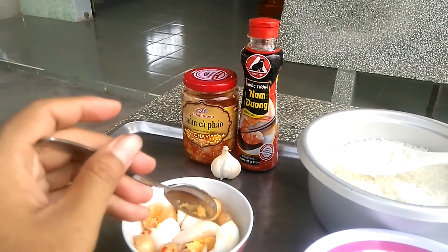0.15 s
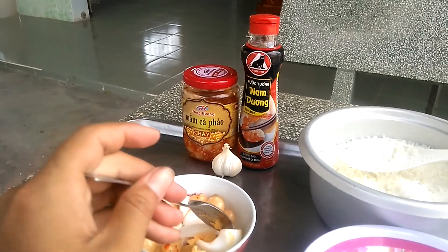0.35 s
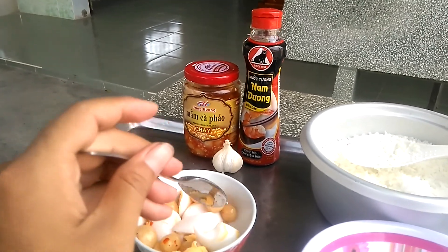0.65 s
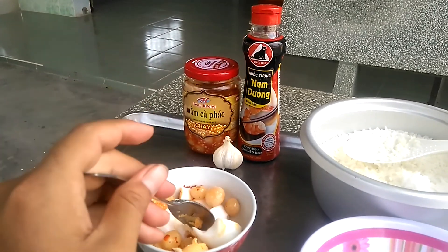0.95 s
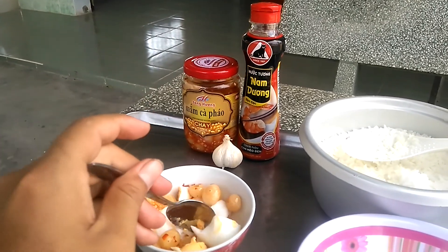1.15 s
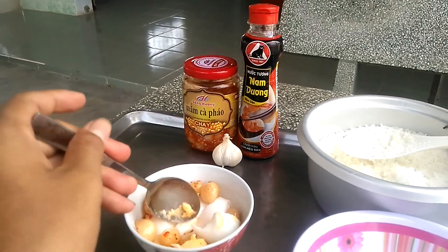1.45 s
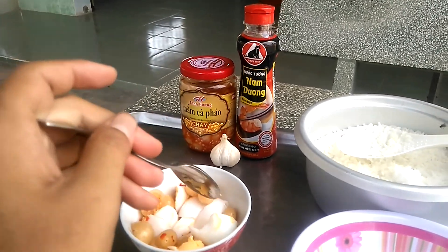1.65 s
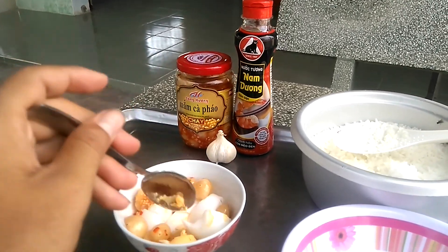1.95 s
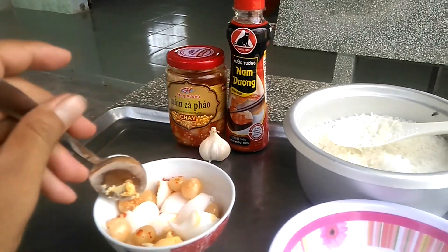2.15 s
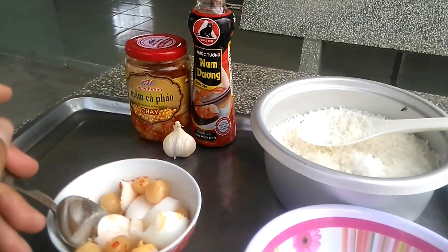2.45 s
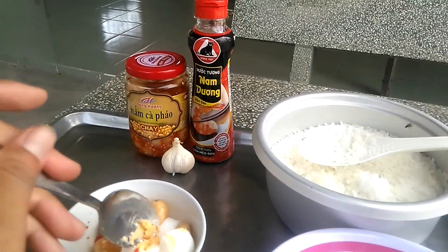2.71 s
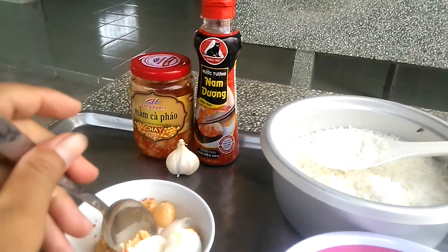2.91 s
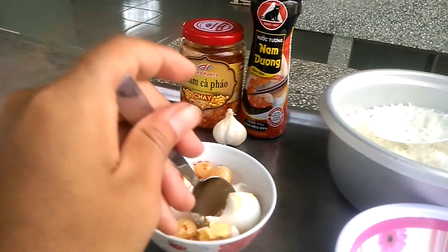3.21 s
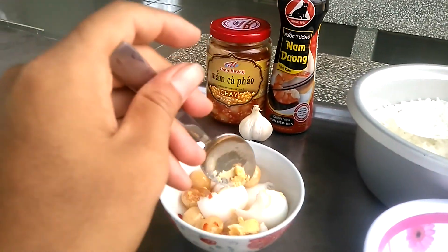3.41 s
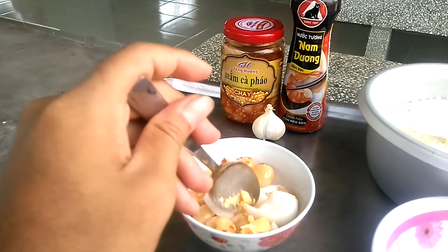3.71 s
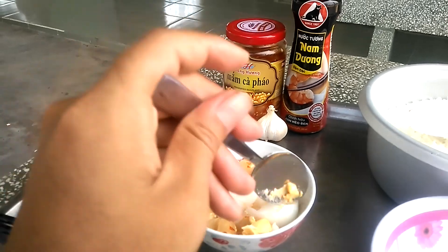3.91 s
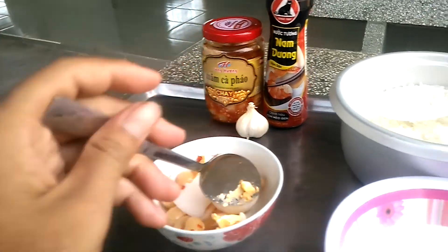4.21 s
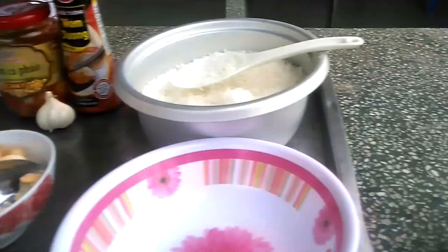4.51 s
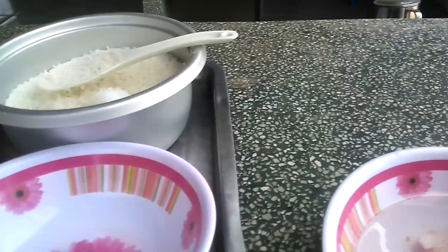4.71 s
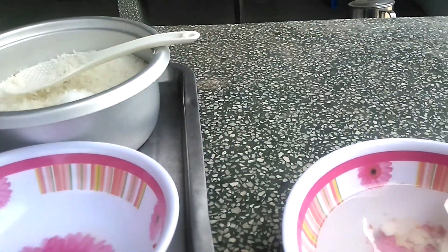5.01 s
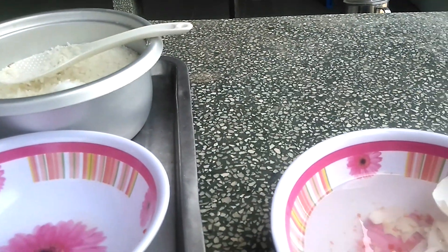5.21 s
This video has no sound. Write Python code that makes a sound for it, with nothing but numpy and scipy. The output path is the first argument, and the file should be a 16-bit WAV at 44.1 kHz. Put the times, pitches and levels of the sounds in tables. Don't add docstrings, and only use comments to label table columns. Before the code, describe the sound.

A steel spoon cuts food in a small ceramic bowl with dull clacks, then drops on the rim with bright clinks, amid wind pops.

```python
import sys
import numpy as np
from scipy import signal
from scipy.fft import rfft, irfft
from scipy.io import wavfile
from scipy.ndimage import uniform_filter1d

SR = 44100
rng = np.random.default_rng(int(sys.argv[2]) if len(sys.argv) > 2 else 0)


def invert_db(x):
    u = np.asarray(x, float) / 20
    return 10 ** u


def generate_wav(sig):
    pcm = np.round(np.clip(np.atleast_2d(sig).T, -1, 1) * 32767).astype(np.int16)
    wavfile.write(sys.argv[1], SR, pcm)


N = 236243

# frequency in Hz, level in dB per Hz.
AIR_SPECTRUM = [(40, -0.5), (100, -13), (200, -13), (400, -10), (700, -12), (1000, -13.5), (1500, -13.5),
                (2500, -16.5), (3700, -22.5), (4400, -30.5), (7000, -31.5), (10000, -36), (13500, -38.5),
                (15000, -55)]
AIR_DB = -60.5
# frequency in Hz, correlation from 0 to 1.
PORT_LIKENESS = [(60, 0.36), (180, 0.59), (550, 0.92), (1650, 0), (4970, 0.088), (15000, 0)]
# multiple of the fundamental, level in dB.
MOTOR_HARMONICS = [(3, -66.5), (4, -59.5), (5, -60), (6, -62), (8, -74)]
MOTOR_HZ = 64.9

# start in seconds, length in seconds, rumble in dB, left minus right in dB.
GUSTS = [(0, 0.022, -61, 1), (.17, .13, -56.5, 18), (.545, 0.17, -53, 17), (.74, 0.032, -61, -17),
         (1.0, 0.33, -63, 11.5), (1.39, 0.039, -53, 14), (1.45, 0.23, -53.5, -1),
         (1.768, 0.032, -36.5, 22.5), (1.83, 0.058, -41, -3), (1.93, 0.083, -47, 11.5),
         (2.065, 0.013, -46, 20), (2.13, 0.08, -49, 24), (2.35, 0.023, -53.5, 26), (2.46, 0.077, -57, 18),
         (2.55, 0.32, -66, 17), (2.98, 0.089, -49.5, 5.5), (3.05, 0.12, -46, 7), (3.19, 0.031, -54, 10),
         (3.29, .18, -38.5, 12.5), (3.54, 0.22, -53, -3), (3.88, .03, -58, 20), (4.085, 0.084, -53, 5),
         (5.32, .04, -59, 20.5)]
CALM_DB, GUST_RISE_S, GUST_FALL_S = -73, 0.0098, 0.015
PUFF_GAP_S, PUFF_OVER_DB, PUFF_SPREAD_DB, PUFF_HZ = 0.036, 2.5, 2, 180
# time in seconds, level in dB, pitch in Hz, port (0 left, 1 right).
POPS = [(.18, -32, 137, 0), (0.231, -31.5, 199, 0), (.293, -50, 180, 0), (0.564, -31.5, 312, 0),
        (.576, -28, 220, 0), (0.66, -26.5, 187, 0), (.698, -29, 180, 0), (.751, -38.5, 180, 1),
        (1.407, -27.5, 124, 0), (1.773, -20, 330, 0), (1.784, -12, 210, 0), (1.843, -10, 245, 1),
        (1.878, -31.5, 210, 1), (1.973, -27, 197, 0), (2.004, -28, 190, 0), (2.08, -12.5, 230, 0),
        (2.149, -24.5, 312, 0), (2.166, -23.5, 197, 0), (2.186, -25.5, 278, 0), (2.492, -28, 200, 0),
        (3.08, -31, 130, 1), (3.162, -28, 190, 0), (3.304, -28.5, 210, 0), (3.379, -29, 144, 0),
        (3.42, -26.5, 212, 1), (3.444, -24, 200, 0), (3.459, -25, 286, 0), (3.609, -37, 200, 1),
        (3.76, -34.5, 119.8, 1), (5.337, -35.5, 217, 0)]

# start in seconds, time held in seconds, gain while open in dB.
OPENINGS = [(.109, 0.113, -3.5), (.28, 0.05, -7.5), (.42, 0.045, -11), (0.539, .16, -3), (1.073, 0.049, -6),
            (1.251, 0.057, -0.5), (1.761, 0.13, -4), (1.936, 0.11, -4), (2.056, 0.16, -5.5),
            (2.348, 0.049, -7.5), (2.45, 0.09, -8.5), (2.643, 0.074, -6), (2.905, 0.095, -8),
            (3.019, 0.69, -9), (3.345, 0.13, -1), (3.728, 0.09, -1.5), (4.083, .12, -3),
            (4.412, 0.165, -1.5), (4.638, 0.23, -2.5), (5.32, .05, -10)]
# time in seconds, gain in dB.
SHUT_GAIN = [(0, -13), (1.4, -11), (2.6, -11), (3.6, -14), (4.3, -14.5), (5.36, -15)]
CLOSING_S, AJAR_DB, AJAR_DB_PER_S = 0.016, -7, 28

# frequency in Hz, level in dB, rise in seconds,
# left minus right in dB.
LID_MODES = [(690, -20, 0.0015, 0), (1477, -0.5, 0.0015, -3.5), (3300, -21.5, 0.00089, 1),
             (4580, -35.5, .0015, 3), (5780, -25, .0006, 11), (6650, -22.5, 0.0016, -2.5),
             (8600, -17, .0004, -7), (13000, -20.5, .0002, 1.5), (1510, -40.5, 0.0084, -3),
             (1500, -43.5, 0.051, -1.5)]
LID_KNOCK_S = 0.115
# time in seconds, snap in dB, snap pitch in Hz, ring in dB.
TICKS = [
    (.1103, -36, 6800, -60),
    (.1128, -35, 8000, -60),
    (.8724, -32, 7600, -60),
    (1.0764, -39, 8300, -42),
    (1.0805, -29, 7500, -38),
    (1.1078, -36, 8000, -29),
    (1.1125, -37, 8000, -50),
]
SNAP_RISE_S, TICK_RING_HZ, TICK_RING_RISE_S = 0.00018, 3030, 0.0011
# time in seconds, level in dB, pitch in Hz,
# rise in seconds, left minus right in dB.
KNOCKS = [(1.11, -25, 1440, 0.0011, -7), (2.3495, -39.5, 1780, 0.005, -19),
          (2.3505, -25.5, 5850, 0.0041, -7), (2.620, -56.5, 6300, 0.008, 5),
          (3.3505, -24.5, 3470, 0.0022, 18), (3.7319, -15, 4865, 0.0016, 17.5),
          (3.732, -12, 5410, 0.0013, 4), (4.0855, -9, 5840, 0.0023, 10), (4.086, -13, 3378, 0.0032, 5),
          (4.0856, -34, 15400, .0004, 1.5), (3.7312, -40, 15200, .0004, 1.5),
          (3.3503, -42, 15400, .0004, 1.5), (1.109, -44, 7200, .002, 1.5), (1.109, -46, 8700, .002, 1.5),
          (1.1078, -42, 4000, .0007, 1.5), (1.252, -37, 3300, .0015, 4), (1.252, -43, 4400, .002, 6),
          (1.252, -42, 5500, .002, 3), (1.252, -43, 6550, .002, 4), (1.252, -46, 8600, .0015, -3),
          (1.252, -47, 10800, .0015, 1.5), (1.252, -40, 1400, .002, -5), (1.9455, -37, 1300, .003, -5),
          (1.9455, -46, 5500, .002, 3), (4.0858, -20, 8750, .0025, -5), (4.0858, -20, 1790, .0035, -9),
          (2.3495, -42, 3500, .004, 4)]
# time in
# seconds, level in dB, pitch in Hz, rise in seconds, left minus right in dB.
MODE_SWELLS = [(2.355, -58, 5850, 0.014, 6), (3.355, -33, 3425, 0.013, -6), (3.74, -46, 4900, 0.032, 7.5),
               (3.74, -45, 5330, .035, 4), (3.745, -48, 5120, .04, 6), (3.74, -54, 12500, .025, 3),
               (1.95, -54, 11000, .012, 1.5), (4.1, -46, 8740, .03, -4), (4.1, -38, 3422, 0.056, 2),
               (4.095, -36, 5830, .045, 2), (4.4175, -7.5, 5810, 0.012, 7), (4.44, -22.5, 5812, 0.011, -0.5),
               (4.47, -30, 5810, .012, 5), (4.523, -33, 5810, .014, 9), (4.555, -40, 5810, .03, 5),
               (4.65, -22, 5800, .012, 3), (4.714, -22, 5810, .012, -3), (4.714, -25, 3422, .007, 3),
               (4.575, -42, 5810, .03, 5), (4.097, -33, 1830, .02, -10), (4.086, -26, 6360, .004, 4),
               (4.1, -42, 6360, .03, 4), (3.3505, -24, 4950, .002, 10), (2.35, -44, 6300, .004, 4),
               (4.66, -40, 13130, .02, 8), (4.09, -42, 12290, .02, 4), (2.36, -44, 1770, .007, -10),
               (1.262, -52, 2200, .012, 0.5), (4.648, -15, 3422, 0.015, 9), (4.78, -44, 3422, 0.069, 5)]

# frequency in Hz, t60 in seconds.
ROOM_T60 = [(600, 0.44), (2000, 0.32), (6000, 0.26), (12000, 0.065)]
ROOM_DB = -11

# time in seconds, level in dB, tilt in dB per octave,
# favoured pitch in Hz, share of the full ring time, contact spot.
CUTS = [
    (0.5392, -28, -4.5, 1300, 0.49, "floor"),
    (1.2521, -43.5, -2.5, 3300, 0.21, "side"),
    (1.946, -32, -8, 3890, 0.33, "yolk"),
    (2.908, -50, -11, 2520, 0.75, "yolk"),
    (3.3503, -28, -0.5, 1736, 0.32, "curve"),
    (3.7312, -24.5, -3.5, 5160, 0.38, "foot"),
    (.5417, -29, -4.5, 3400, .6, "floor"),
    (.5446, -31, -4.5, 1800, .6, "floor"),
    (1.274, -52, -6, 2200, .4, "side"),
]
# time in seconds, level in dB, tilt in dB per octave,
# favoured pitch in Hz, share of the full ring time, contact spot.
CLINKS = [
    (2.3492, -37, -1, 5850, 0.3, "held"),
    (4.0856, -21.5, 1, 12040, 0.35, "lip"),
    (4.1504, -40.5, 0, 3320, 0.4, "lip"),
    (4.4140, -18.5, 1.5, 2616, 0.29, "edge"),
    (4.6406, -28, 2, 3430, 0.55, "bounce"),
    (4.6485, -28, 2.5, 8150, 1, "free"),
    (4.7127, -31, 2.5, 3420, 0.7, "free"),
    (4.4248, -27, 0, 2400, .3, "edge"),
    (4.437, -28, 0, 2400, .3, "edge"),
    (4.7919, -48, 2, 3420, .8, "bounce"),
]
# frequency in Hz, level in dB, t60 in seconds,
# left minus right in dB, phase lead of the left in radians.
LOADED_MODES = [(869.7, -4, 0.12, -2, 2), (1256, -7.5, 0.05, -32.5, 1), (1446, -4, 0.044, -41, 5),
                (1683, 2.5, 0.1, -5.5, 1.5), (2030, 14.5, 0.033, 2, 3.5), (2220, 8.5, 0.063, -0.5, 10.5),
                (2631, -9.5, 0.42, -0.5, -2.5), (3080, -7, 0.14, -11, -9.5), (3436, 4, 0.047, 13.5, -2.5),
                (4330, -3, 0.05, 5, -1), (1820, -4, .11, -8, 2), (3410, -3, .12, 8, -2.5),
                (5660, -4, .12, 3, 1.5), (6600, -3, .15, 6, .8), (12300, -6, .15, 4, 1.5),
                (5274, 23, 0.011, 11, 5.5), (4730, -20, 0.11, 4, 4), (6000, 11, 0.08, -2.5, -4.5),
                (6440, 14.5, 0.039, 2, -6.5), (6040, 15, 0.027, 12, -6.5), (7970, 3.5, 0.014, 29.5, -5.5),
                (8700, 1.5, 0.065, -8, 22.5), (9480, -5, 0.02, -26.5, 23), (11100, 3, 0.01, -37, -10),
                (13100, -17, .03, -6, -5), (13950, -55, 0.065, -12, -16)]
# frequency in Hz, level in dB, t60 in seconds,
# left minus right in dB, phase lead of the left in radians.
RIM_MODES = [(1565, -8.5, .05, -10, 2.5), (1748, 5, 0.09, -12, 2.5), (1778, 5, 0.09, -11, -2.5),
             (1832, -2, 0.1, -13, 2), (2230, -5, 0.06, -3, 1.16), (2400, -3, .06, -12, 0.1),
             (2620, 2.5, 0.04, -6, 0.3), (3030, 0.1, 0.08, 9, 2), (3422, 7, 0.13, 5, -2.5),
             (3397, -7, .16, -3, -2), (3650, -8, .08, 6, -2.5), (4210, -8, 0.06, 14, -2.5),
             (4950, -6, 0.05, 14, 2.5), (5690, -4, 0.08, -2, 0.5), (5810, 8, 0.1, 5, 0.7),
             (5885, -3, 0.1, 7, -1), (6625, -7.5, 0.1, 9, 0.8), (7290, -19, 0.1, 14, 2.8),
             (8150, -13, .11, -1, -0.3), (8790, 2.5, 0.085, -6, 2.17), (9580, -9, 0.1, 2.5, -0.3),
             (9990, -17, .12, -1, 0.5), (11750, -22, .14, 1.5, -1), (12290, -16, 0.14, 5, 1.5),
             (12570, -20, 0.14, 0.5, -1.1), (13130, -23, 0.16, 5, -0.3)]
SPOT_HZ = [1300, 1760, 2400, 3030, 3420, 4200, 5810, 6620, 8790, 12300]
SPOT_DB = {"floor": [-6, -1.5, -3, 7, 8, 3, -15, -1, 2, 2], "side": [-5, 0.1, -3, -4, -4, 8, -6, -2, 4,
           0.1], "yolk": [3, -5, 6, 4, 1.5, 3, -3, -3, 1.5, 0.1], "curve": [-2, -3, 5, -3, 0.1, -3, 5, -4,
           -2, 4], "foot": [-9, -1.5, 1.5, -10, -2, -2, -5, -6, -1.5, 2.5], "held": [-3, 4, 4, -1.5, 5, 11,
           -3, 0.1, -6, -3], "lip": [-9, -1.5, -9, -3, -3, 4, -2, -10, -2, 0.1], "edge": [3, 1.5, 1.5, -2,
           -7, 4, -6, -3, 1.5, 2.5], "bounce": [5, 1.5, -1.5, 6, 3, 5, 0.1, 8, -4, 4], "free": [4, -3, -7,
           -1.5, 1.5, 0.1, 4, 5, 2.5, 4]}
FAVOURED_DB, FAVOURED_OCTAVES = 8.5, 0.12
# frequency in Hz, level in dB per Hz.
TRAY_SPECTRUM = [(500, -22.5), (900, 0), (3000, 7), (6000, -1), (8500, -10), (10700, -24), (12700, -7),
                 (14000, -24.5)]
TRAY_T60_S, CRACK_T60_S = 0.11, 0.077

# start in seconds, time held in seconds, level in dB.
SKIDS = [
    (4.415, 0.017, -23.5),
    (4.493, .05, -36),
    (4.644, 0.049, -27),
    (4.709, 0.04, -28.5),
]
SKID_FALL_DB_PER_S, SETTLE_DB, SETTLE_DB_PER_S = 545.5, -17, 109.5


def at_hz(points, hz):
    point_hz, value = np.array(points).T
    return np.interp(np.log(hz), np.log(point_hz), value)


def add(out, s, sound):
    i = max(round(s * SR), 0)
    out[:, i:i + sound.shape[1]] += sound[:, :max(N - i, 0)]


def sides(pan_db):
    return invert_db(np.multiply.outer([.5, -.5], pan_db))


def band_pass(x, low_hz, high_hz):
    return signal.sosfilt(signal.butter(2, [low_hz, high_hz], "band", fs=SR, output="sos"), x)


def bands(white, low_hz):
    edges = low_hz * 2 ** np.arange(0, np.log2(17000 / low_hz), .5)
    for k, (low, high) in enumerate(zip(edges, edges[1:])):
        yield np.sqrt(low * high), band_pass(white[k % 2], low, high)


def coloured(x, spectrum_db):
    n = x.shape[-1]
    hz = np.maximum(np.arange(n // 2 + 1) * SR / n, 1)
    return irfft(rfft(x) * invert_db(spectrum_db(hz)), n)


def slow_times():
    return np.arange(0, N + 16, 16) / SR


def fine(envelope):
    return np.array([np.interp(np.arange(N) / SR, slow_times(), row) for row in np.atleast_2d(envelope)])


def air():
    out = 0
    for hz, (mid, side) in bands(rng.standard_normal((2, 2, N)), 37.6):
        alike = at_hz(PORT_LIKENESS, hz)
        shared = np.sqrt(1 + alike) * mid
        opposed = np.sqrt(1 - alike) * side * [[1], [-1]]
        out = out + invert_db(at_hz(AIR_SPECTRUM, hz)) * (shared + opposed)
    return invert_db(AIR_DB + 13.5) * out / np.std(out)


def motor_hum():
    sway = uniform_filter1d(rng.standard_normal(N), size=SR // 3)
    turn = 2 * np.pi * np.cumsum(MOTOR_HZ * (1 + 0.0068 * sway / np.std(sway))) / SR
    return sum(invert_db(level_db) * np.sin(k * turn + k * k) for k, level_db in MOTOR_HARMONICS)


def puff(out, s, level_db, hz, port):
    u = np.arange(-SR // 60, SR // 60) / SR
    pulse = np.exp(-(2.4 * u * hz) ** 2) * np.cos(2 * np.pi * u * hz + .6 * rng.standard_normal())
    add(out, s + u[0], np.outer(np.eye(2)[round(port)], invert_db(level_db) * pulse))


def wind(low_hz, high_hz, lumpy_db):
    t = slow_times()
    rumble_noise, lump_noise = rng.standard_normal((2, 2, N))
    rumble = band_pass(rumble_noise, low_hz, high_hz)
    lumps = signal.sosfilt(signal.butter(2, 25, fs=SR, output="sos"), lump_noise)
    rumble = rumble * invert_db(lumpy_db * lumps / np.std(lumps))
    strength, out = invert_db(CALM_DB), np.zeros((2, N))
    for s, length, level_db, pan_db in GUSTS:
        rise, fall = (t - s) / GUST_RISE_S, (s + length - t) / GUST_FALL_S
        swell = np.exp(np.minimum(np.minimum(rise, fall), 0))
        strength = strength + invert_db(level_db) * sides(pan_db)[:, None] * swell
        for k, (late, size, pitch) in enumerate(rng.standard_normal((16, 3))):
            after = (k + .5 + late / 4) * PUFF_GAP_S
            if after <= length:
                puff_db = level_db + PUFF_OVER_DB + PUFF_SPREAD_DB * size
                puff(out, s + after, puff_db, PUFF_HZ * 1.25 ** pitch, pan_db < 0)
    for pop in POPS:
        puff(out, *pop)
    return out + fine(strength) * rumble / np.std(rumble)


def suppressor():
    t = slow_times()
    gain_db = np.interp(t, *np.transpose(SHUT_GAIN))
    for s, held, open_db in OPENINGS:
        since = np.clip(t - s - held, 0, None)
        closing_db = open_db + np.maximum(-since * 12 / CLOSING_S, AJAR_DB - since * AJAR_DB_PER_S)
        gain_db = np.maximum(gain_db, np.where(t > s - .001, closing_db, -99))
    return fine(invert_db(uniform_filter1d(gain_db, size=8)))


def knocks(rows, steep, lead):
    out = np.zeros((2, N))
    for s, level_db, hz, rise, pan_db in rows:
        t = np.arange(min(round(9 * rise * SR), SR // 5)) / SR
        swell = (t / rise * np.exp(1 - t / rise)) ** steep
        tone = np.sin(2 * np.pi * hz * t + [[lead / 2], [-lead / 2]])
        add(out, s, sides(pan_db)[:, None] * invert_db(level_db) * swell * tone)
    return out


def small_knocks():
    rows = [(LID_KNOCK_S, level_db, hz, rise, pan_db) for hz, level_db, rise, pan_db in LID_MODES]
    rows += [(s, snap_db, hz, SNAP_RISE_S, 0) for s, snap_db, hz, _ in TICKS]
    rows += [(s, ring_db, TICK_RING_HZ, TICK_RING_RISE_S, 0) for s, _, _, ring_db in TICKS]
    return knocks(rows + list(KNOCKS), steep=1.5, lead=-.5)


def room(x):
    t = np.arange(SR // 2) / SR
    tail = 0
    for hz, band in bands(rng.standard_normal((2, 2, len(t))), 299):
        tail = tail + band * invert_db(-60 * t / at_hz(ROOM_T60, hz))
    tail = tail * np.clip(t / .007, 0, 1)
    tail = tail / np.sqrt(np.sum(tail ** 2, axis=1, keepdims=True))
    return invert_db(ROOM_DB) * signal.fftconvolve(x, tail, axes=1)[:, :N]


def strikes(hits, modes, low_hz, crack_db, tray_db, loose):
    out, t = np.zeros((2, N)), np.arange(SR // 4) / SR
    hz, mode_db, t60, pan_db, lead = np.transpose(modes)
    for s, level_db, tilt_db, favoured_hz, share, spot in hits:
        def colour(f):
            tilt = tilt_db * np.clip(np.log2(f / low_hz), 0, 2.5)
            favour = FAVOURED_DB * np.exp(-(np.log2(f / favoured_hz) / FAVOURED_OCTAVES) ** 2)
            return level_db + tilt + favour

        chance = rng.standard_normal((3, len(hz)))
        drive_db = colour(hz) + at_hz(np.c_[SPOT_HZ, SPOT_DB[spot]], hz)
        gain = invert_db(drive_db + mode_db + 2.5 * chance[0])
        detuned_hz = hz * (1 + loose * chance[2])
        decay = np.exp(np.outer(-np.log(1000) / (t60 * share) + 2j * np.pi * detuned_hz, t))
        phase = np.exp(1j * (np.outer([.5, -.5], lead + 0.78 * chance[1]) + 9 * chance[0]))
        ring = ((gain * sides(pan_db) * phase) @ decay).imag
        dense = coloured(rng.standard_normal((2, len(t))), lambda f: colour(f) + at_hz(TRAY_SPECTRUM, f))
        crack = invert_db(crack_db - 60 * t / CRACK_T60_S)
        shake = invert_db(tray_db - 60 * t / (TRAY_T60_S * share))
        onset = 1 - np.exp(-t / 0.00089)
        add(out, s, (ring + dense * (crack + shake)) * onset)
    return out


def skid(per_s, ring_db, damped):
    first, last = round(SKIDS[0][0] * SR), round(SKIDS[-1][0] * SR) + SR // 2
    t, level = np.arange(first, last) / SR, 0
    for s, held, level_db in SKIDS:
        since = np.clip(t - s - held, 0, None)
        fall_db = np.maximum(-SKID_FALL_DB_PER_S * since, SETTLE_DB - SETTLE_DB_PER_S * since)
        level = level + (t >= s) * invert_db(level_db + fall_db)
    chance, size, sign = rng.random((3, len(t)))
    touches = level * (chance < per_s / SR) * -np.log(size) * np.sign(sign - .5)
    touches = touches * np.sqrt(SR / per_s / 2)
    blur = rng.standard_normal((2, 512)) * invert_db(-60 * np.arange(512) / 512) / 6
    rasp = signal.fftconvolve(touches[None], blur, axes=1)[:, :len(t)]
    sound = coloured(rasp, lambda f: at_hz(TRAY_SPECTRUM, f))
    for hz, mode_db, t60, pan_db, lead in RIM_MODES:
        pole = invert_db(-60 / (t60 * damped * SR)) * np.exp(2j * np.pi * hz / SR)
        uneven = touches * rng.standard_normal(len(t))
        ring = signal.lfilter([invert_db(mode_db + ring_db)], [1, -pole], uneven)
        sound += sides(pan_db)[:, None] * np.outer(np.exp([.5j * lead, -.5j * lead]), ring).imag
    out = np.zeros((2, N))
    add(out, SKIDS[0][0], sound)
    return out


def scene():
    table = strikes(CUTS, LOADED_MODES, low_hz=1650, crack_db=5.0, tray_db=11.5, loose=0.014)
    table += strikes(CLINKS, RIM_MODES, low_hz=1780, crack_db=1.5, tray_db=0.5, loose=0.0015)
    table += knocks(MODE_SWELLS, steep=2.87, lead=-1.96)
    table += skid(per_s=4000, ring_db=-34.5, damped=0.67)
    near = small_knocks()
    echoes = room(table + invert_db(-12) * near)
    gated = suppressor() * (table + near + echoes + air() + motor_hum())
    return gated + wind(low_hz=40.4, high_hz=180, lumpy_db=6.0)


def top_cut(x):
    return signal.sosfilt(signal.butter(12, 16810, fs=SR, output="sos"), x)


def record(dry):
    rounded = 1.2 * np.tanh(dry / 1.2)
    heard = signal.sosfilt(signal.butter(4, 47, "high", fs=SR, output="sos"), rounded)
    heard = signal.sosfilt(signal.butter(8, 13700, fs=SR, output="sos"), heard)
    return top_cut(heard)


dry = scene()
out = record(dry)
generate_wav(out)
```